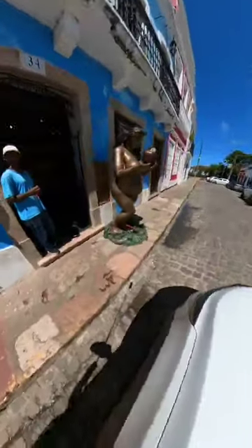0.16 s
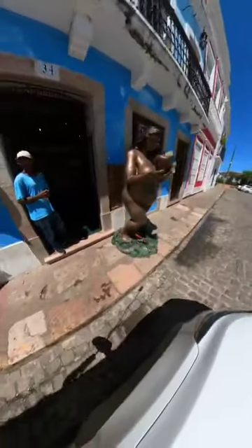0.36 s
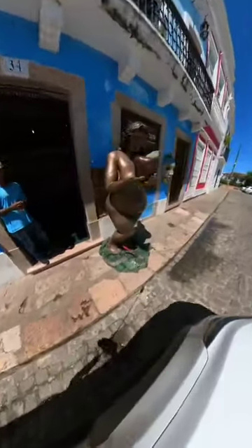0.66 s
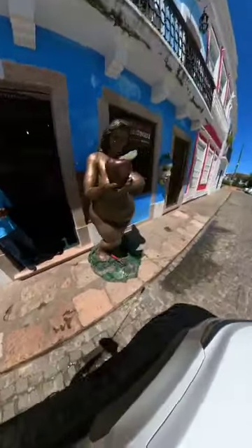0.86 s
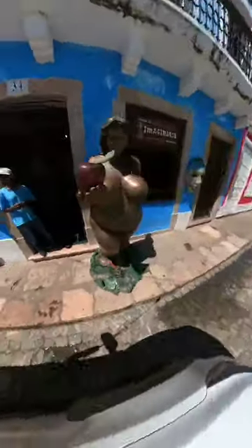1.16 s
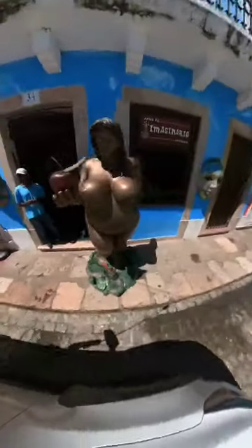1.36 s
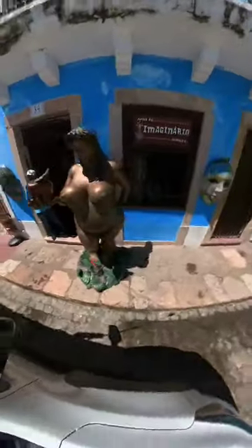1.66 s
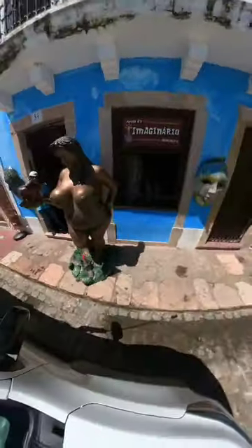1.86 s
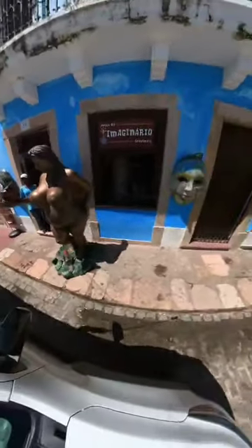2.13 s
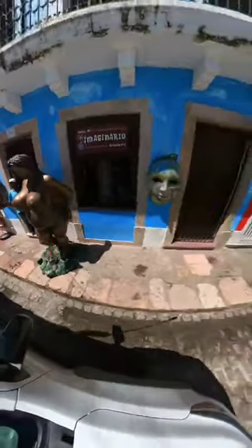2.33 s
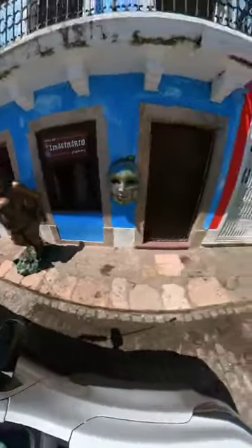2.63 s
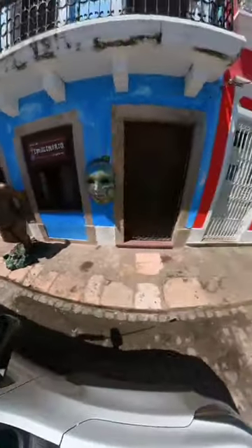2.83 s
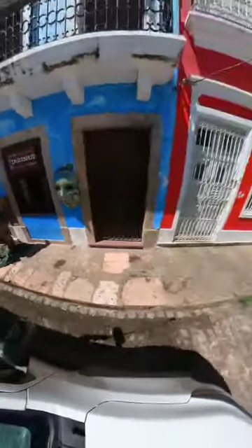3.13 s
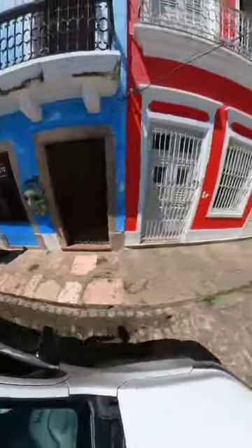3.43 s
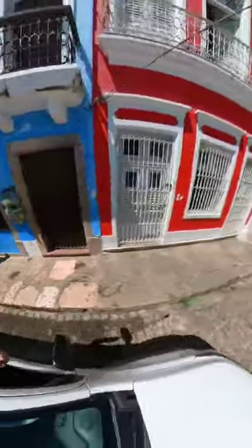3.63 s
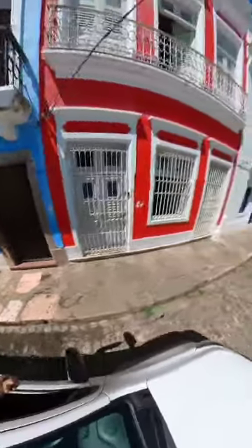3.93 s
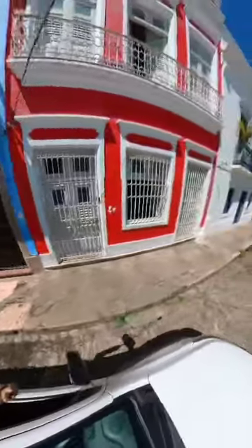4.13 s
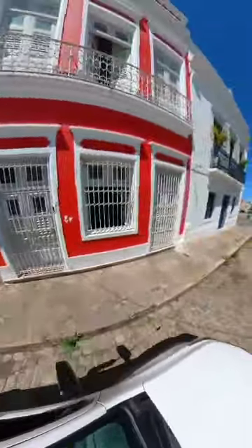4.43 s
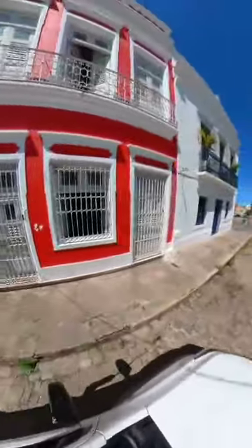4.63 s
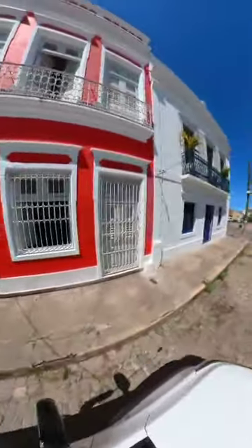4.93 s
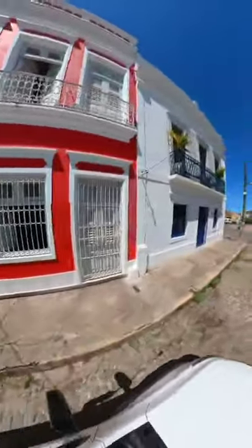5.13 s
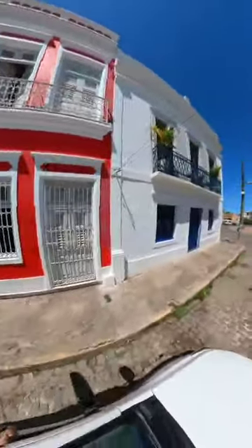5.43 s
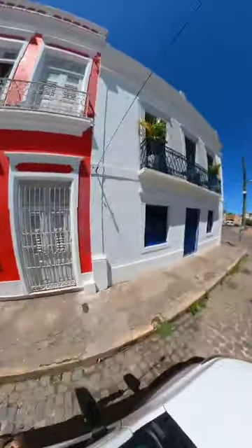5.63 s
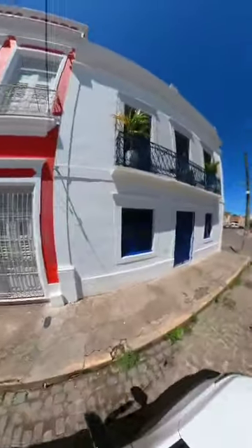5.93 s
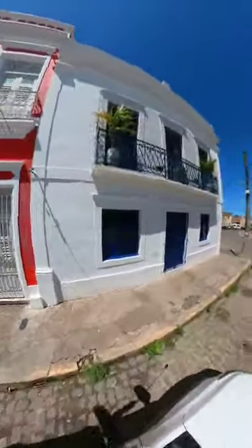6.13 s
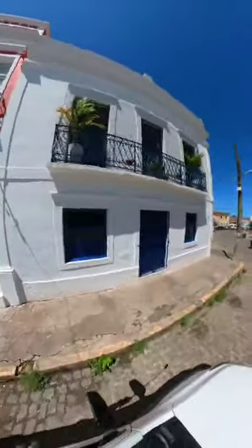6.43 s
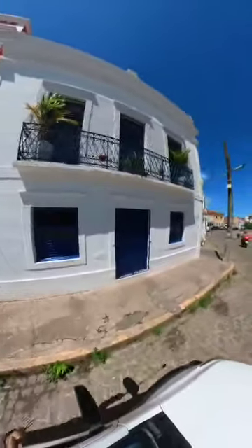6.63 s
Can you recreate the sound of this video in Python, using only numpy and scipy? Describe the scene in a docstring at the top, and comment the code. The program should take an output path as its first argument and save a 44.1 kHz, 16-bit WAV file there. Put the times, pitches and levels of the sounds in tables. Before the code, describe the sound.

Continuous low, bumpy tyre noise from a car on cobbles, held close to an exposed microphone, with slight reflections from nearby house fronts. The engine hums unsteadily underneath, rising a little midway. Small grit ticks stay faint. Muffled wind builds gradually, and deep falling-pitch thuds crowd together around five seconds, then thin out before the end.

```python
"""Cobbled street along house fronts: a small car rolls past them, microphone held outside the car.
Tyres: stone impacts trigger noise bursts that drum, roar, patter, hiss and crunch grit; the body booms in two modes.
Engine: wavering hum and drone tones climb as the car picks up a little speed.
Wind: growing muffled rumble, throbs and hard falling-pitch thumps; road noise dips in strong gusts."""
import sys
import numpy as np
from scipy import signal
from scipy.fft import rfft, irfft, next_fast_len
from scipy.io import wavfile
from scipy.ndimage import uniform_filter1d, minimum_filter1d, map_coordinates

SR = 44100
rng = np.random.default_rng(int(sys.argv[2]) if len(sys.argv) > 2 else 0)


def persist_wave(psi):
    """Save psi, clipped to +-1, as 16-bit WAV."""
    counts = np.round(np.clip(psi, -1, 1) * 32767).astype(np.int16)
    wavfile.write(sys.argv[1], SR, np.atleast_2d(counts).T)


N = 298998  # samples

# Tyre effort, groove ring and grit: t/s, rolling level/dB, groove ring level/dB, grit level/dB
ROAD = [(0, -2, -53, -70), (.75, -2.5, -51.5, -67), (1.28, 0, -48, -63.5), (1.35, -0.3, -50.5, -61),
        (2.2, 0.5, -46.5, -61), (2.5, 2.5, -46.5, -61), (2.6, 2.5, -45, -61), (3.0, 2.5, -45, -62),
        (3.45, 1, -48, -60), (4.0, 1.66, -46, -58), (4.9, 1, -48.5, -61), (5.5, -1.1, -51.5, -64.5),
        (6.05, 1.9, -65, -63.5), (6.78, -3.5, -55, -66.5)]
# Tyre spectra: f/Hz, relative density/(dB per Hz)
DRUM_SPECTRUM = [(40, -23), (90, -4), (140, -1.5), (200, -6), (300, -11.5), (450, -15.5), (800, -21.5),
                 (2000, -80), (5000, -110)]
ROAR_SPECTRUM = [(150, -26), (330, -4), (470, 0.5), (620, -1.5), (760, -6), (1000, -8), (1200, -18),
                 (1600, -21.5), (3000, -63), (8000, -100)]
PATTER_SPECTRUM = [(600, -29.5), (1100, 2.5), (1400, 0.5), (1600, -2.5), (1880, -1.5), (2300, -10),
                   (2750, -13.5), (3200, -19.5), (3550, -18.5), (4100, -31.5), (4700, -39.5), (6000, -37.5),
                   (9000, -92)]
# Air ringing in the tread grooves: f/Hz, relative density/(dB per Hz)
GROOVE_SPECTRUM = [(600, -36.5), (850, -5), (980, 0), (1130, -5), (1300, -11), (1800, -36.5), (5000, -92)]
# Tyre hiss near 3 kHz: f/Hz, relative density/(dB per Hz)
HISS_SPECTRUM = [(1900, -34), (2500, 0), (2900, -1.5), (3500, -13), (4300, -23.5), (6000, -49.5)]
# Hiss level before dips: t/s, level/dB
HISS_LEVEL = [(0, -72), (2.5, -69.5), (4.8, -65.5), (5.6, -62), (6.78, -63)]
# Singing tread blocks: multiple of drone f, level re groove ring/dB
WHINES = [(1.5, -3.5), (2.3, -2.5), (3.2, -4.5), (4.25, -3.5), (5.4, -12)]
# Car body modes, response squared in use: f/Hz, width before squaring/Hz, relative level/dB
BODY_MODES = [(108.3, 11, -5), (156.1, 16, -1)]
# Grit fizz and cracks: f/Hz, relative density/(dB per Hz)
GRIT_SPECTRUM = [(3000, -45), (4700, -24), (5300, -18), (6000, -6.5), (6600, 0.5), (7400, 1), (8000, -1.5),
                 (8500, -10.5), (9000, -22), (9500, -37.5), (9800, -62), (10500, -79.5)]
# Grit cracking under the tread: t/s, nominal peak level/dB
CRACKS = [(1.312, -49.5), (1.333, -44), (1.509, -43), (1.557, -42), (1.7386, -45.5), (1.803, -50),
          (1.985, -41.5), (2.62, -49.5), (3.098, -45.5), (3.194, -45.5), (3.358, -51), (3.8157, -52),
          (3.924, -38), (3.943, -49.5), (4.106, -46.5), (4.152, -46), (4.2046, -44), (4.782, -44.5),
          (6.058, -49)]
# Drivetrain drone: t/s, f/Hz
DRONE = [(0, 214), (2, 219.8), (2.65, 244.9), (3.05, 252.9), (3.55, 248.7), (4.3, 252.6), (4.9, 260.7),
         (5.5, 259.9), (6.78, 256.5)]
# Engine hum: t/s, f/Hz, level/dB
HUM = [(0, 101, -41.5), (.6, 102, -34.5), (.8, 103, -39), (1.2, 107, -34), (1.5, 108.5, -32.5),
       (2.2, 108, -33), (2.55, 109, -36), (2.8, 110, -26.5), (3.15, 116, -43.5), (4, 125.6, -35),
       (5.5, 130, -37), (6.2, 131, -30.5), (6.78, 131, -34)]
# Strong gusts: t/s, length including attack/s, depth of road noise dip/dB
GUSTS = [(4.628, 0.032, 3), (5.045, 0.073, 7.5), (5.164, 0.09, 4.5), (5.293, 0.081, 6), (5.432, 0.094, 5),
         (5.557, .03, 1), (5.675, 0.081, 3), (5.778, 0.051, 3.5), (5.892, .035, 4), (6.1, 0.028, 1),
         (6.19, 0.027, 2.5), (6.554, 0.12, 3)]
# Deep wind rumble: f/Hz, relative density/(dB per Hz)
BUFFET_SPECTRUM = [(10, -22.5), (22, -10.5), (35, 5), (65, 3), (100, -0.5), (160, -17.5), (300, -32.5),
                   (800, -52), (2000, -100)]
# Small eddies: f/Hz, relative density/(dB per Hz)
TUMBLE_SPECTRUM = [(70, -24.5), (140, -0.5), (200, -8), (330, -13.5), (600, -28.5), (1500, -68.5)]
# Small eddies: t/s, level/dB
TUMBLE_LEVEL = [(0, -43), (2, -49), (2.6, -34.5), (4, -36.5), (5.5, -35), (6.1, -36), (6.78, -39)]
# Airstream throbs: t/s, length/s, f/Hz, level/dB
THROBS = [(2.477, 0.034, 113, -14), (3.661, 0.66, 32.85, -32), (4.396, 0.26, 36.5, -31),
          (5.41, 0.13, 165, -26), (5.685, .03, 120, -19), (6.477, 0.21, 66.1, -24.5)]
# Wind thumps: t/s, relative peak level/dB, starting f/Hz, decay length/s, front steepness (0-2)
THUMPS = [(.845, -18, 75, .025, .3), (1.021, -17.5, 160, .028, 1), (2.404, -22, 240, .014, .8),
          (2.466, -15.5, 75, .022, .5), (2.489, -13.5, 135, .024, 1), (2.951, -21, 260, .016, 1),
          (3.692, -17, 180, .028, .8), (3.755, -17.5, 170, .024, .5), (3.911, -16, 80, .02, .3),
          (4.027, -20.5, 300, .014, .5), (4.275, -14.5, 160, .018, 1.1), (4.63, -10.5, 165, .03, 1.2),
          (4.883, -20, 220, .02, .8), (4.921, -17.5, 200, .02, .6), (4.963, -16.5, 170, .02, .5),
          (5.056, -16, 400, .009, 1), (5.069, -11, 100, .022, .6), (5.074, -15, 380, .007, .8),
          (5.221, -13.5, 140, .016, .8), (5.272, -22, 260, .012, .8), (5.319, -13, 90, .015, .3),
          (5.437, -14.5, 190, .016, 1.1), (5.465, -15, 175, .02, .5), (5.504, -17, 130, .02, .5),
          (5.693, -10.5, 155, .024, .4), (5.744, -16, 70, .022, .3), (5.749, -16, 390, .009, 1),
          (6.53, -17.5, 240, .014, 1)]

# Laws: (level/dB, dB gained per dB of rolling level)
DRUM_LAW, ROAR_LAW, PATTER_LAW = (-32.5, 0.59), (-39.5, 0.51), (-48, 1.3)
DRONE_LAW = (-43.3, 0.2)
DRUM_DB_PER_OCTAVE, CRUISE_HZ = -1, 244  # drumming against drone f
GROOVE_TRIM_DB = -0.5
WHINE_WIDTH_HZ, WHINE_FADE_DB = 23, 3.5  # width per unit of drone multiple; fade per unit of wobble
GUST_ATTACK_S, GUST_RELEASE_S = .025, .07
# dB per dB of dip: rumble gained; drum, roar and grit lost
GUST_LIFT, GUST_DRUM_DIP, GUST_ROAR_DIP, GUST_GRIT_DIP = 0.12, 0.52, 0.91, 0.94
WIND_START_DB, WIND_RISE_DB_PER_S = -33, 1.52
SMACK_DB, SMACK_T60_S = -15, .04  # at steepness 1, before the thump envelope
BASS_LIMIT, TOP_HZ = 0.3, 9600


def amp(db):
    """Decibels to gain."""
    return 10 ** (np.asarray(db) / 20)


def unit(x):
    """Scale to rms 1."""
    return x / np.sqrt(np.mean(x ** 2) + 1e-20)


def curves(rows):
    """Per-sample interpolation of each column after the time."""
    t_s, *columns = np.transpose(rows)
    return [np.interp(np.arange(N) / SR, t_s, column) for column in columns]


def wobble(rate_hz):
    """Smooth random curve, rate_hz knots per second."""
    knots = rng.standard_normal(int(N * rate_hz / SR) + 4)
    return map_coordinates(knots, [np.arange(N) * rate_hz / SR])


def filtered(x, response):
    """Apply a response of frequency by zero-padded FFT."""
    size = next_fast_len(N + SR // 2)
    return irfft(rfft(x, size) * response(np.fft.rfftfreq(size, 1 / SR)), size)[:N]


def coloured(x, spectrum):
    """Shape x by spectrum points on a log frequency axis, at rms 1."""
    f_hz, db = np.transpose(spectrum)
    return unit(filtered(x, lambda hz: amp(np.interp(np.log(hz + 1), np.log(f_hz), db))))


def add(track, t_s, sound):
    """Mix a short sound into track at t_s."""
    start = max(round(t_s * SR), 0)
    part = track[start:start + len(sound)]
    part += sound[:len(part)]


def blows(rate_hz, scatter, size_db):
    """Impulses near rate_hz, random in time (scatter in mean periods) and size."""
    draw = rng.standard_normal((int(rate_hz * N / SR) + 1, 2))
    periods = np.arange(len(draw)) + scatter * draw[:, 0]
    at = (periods * SR / rate_hz).astype(int) % N
    return np.bincount(at, amp(size_db * draw[:, 1]), N)


def bursts(hits, t60_s, steady):
    """Noise whose power is a steady share plus a decaying puff per hit."""
    t = np.arange(SR // 4) / SR
    decay = amp(-60 * t / t60_s) ** 2
    power = np.abs(signal.fftconvolve(hits ** 2, decay)[:N])
    share = np.clip(steady, 0, 1)
    return rng.standard_normal(N) * np.sqrt(share + (1 - share) * power / power.mean())


def tone(hz, db, waver, flutter_db):
    """Unsteady sine with a weak octave."""
    phase = 2 * np.pi * np.cumsum(hz * (1 + waver * wobble(18))) / SR
    wave = unit(np.sin(phase) + amp(-20.5) * np.sin(2 * phase))
    return amp(db + flutter_db * wobble(14)) * wave


def tyres(stones):
    """Each stone thuds in the carcass and works the tread; the sum dips in gusts."""
    dip_db = gusts()
    thuds = 0.2 * unit(stones) + bursts(stones, t60_s=0.12, steady=0.72)
    drum = coloured(thuds, DRUM_SPECTRUM)
    roar = coloured(street(bursts(stones, t60_s=0.06, steady=0.88), echo_db=-13), ROAR_SPECTRUM)
    drum_gain = amp(drumming() - GUST_DRUM_DIP * dip_db)
    roar_gain = amp(rolling(ROAR_LAW) - GUST_ROAR_DIP * dip_db)
    return drum_gain * drum + roar_gain * roar + amp(-dip_db) * (tread(stones) + hiss(stones))


def tread(stones):
    """Stones slap the tread and squeeze air from its grooves, which ring near 1 kHz."""
    _, groove_db, _ = curves(ROAD)
    slaps = street(bursts(stones, t60_s=0.06, steady=0.85), echo_db=-17.5)
    puffs = street(bursts(stones, t60_s=0.047, steady=0.73), echo_db=-8.5)
    patter = amp(rolling(PATTER_LAW)) * coloured(slaps, PATTER_SPECTRUM)
    ring = amp(groove_db + GROOVE_TRIM_DB) * coloured(puffs, GROOVE_SPECTRUM)
    return patter + ring + amp(groove_db) * whine()


def hiss(stones):
    """Tyre hiss near 3 kHz: steady noise with a puff per stone."""
    hiss_db, = curves(HISS_LEVEL)
    return amp(hiss_db) * coloured(bursts(stones, t60_s=0.05, steady=0.75), HISS_SPECTRUM)


def whine():
    """Tread blocks sing in narrow bands tied to drone f; each wanders and fades on its own."""
    drone_hz, = curves(DRONE)
    out = np.zeros(N)
    for multiple, db in WHINES:
        hz = multiple * drone_hz * (1 + .04 * wobble(6))
        phase = 2 * np.pi * np.cumsum(hz) / SR
        width_hz = multiple * WHINE_WIDTH_HZ
        band = wobble(width_hz) * np.cos(phase) + wobble(width_hz) * np.sin(phase)
        out += amp(db) * unit(band * amp(WHINE_FADE_DB * wobble(7)))
    return out


def rolling(law):
    """Level/dB following the rolling level."""
    level_db, growth = law
    return level_db + growth * curves(ROAD)[0]


def drumming():
    """Jolt level/dB: rises with rolling level, falls slightly as drone f rises."""
    octaves = np.log2(curves(DRONE)[0] / CRUISE_HZ)
    return rolling(DRUM_LAW) + DRUM_DB_PER_OCTAVE * octaves


def street(x, echo_db, count=5):
    """Kerb and house fronts return echoes whose paths drift as the car moves."""
    n = np.arange(N)
    out = x.copy()
    for delay_s in np.geomspace(.007, .034, count):
        lag_s = delay_s * (1 + 0.0594 * wobble(1.3))
        out += amp(echo_db) * map_coordinates(x, [n - lag_s * SR], order=1, mode="reflect")
    return unit(out)


def body(stones):
    """Stone jolts excite the low body resonances."""
    def modes(f):
        total = 0
        for hz, width_hz, db in BODY_MODES:
            damping = 1j * f * width_hz
            total = total + amp(db) * (damping / (hz ** 2 - f * f + damping)) ** 2
        return total
    return amp(drumming() - 10.5) * unit(filtered(stones, modes))


def grit(stones):
    """Sand fizzes steadily and crunches per stone; larger grains crack."""
    grit_db = curves(ROAD)[2] - GUST_GRIT_DIP * gusts()
    sand = rng.standard_normal(N)
    grains = unit(blows(300, scatter=2, size_db=3))
    crunch = bursts(np.sqrt(stones), t60_s=.05, steady=0) + .6 * grains
    # more grit, larger crunch share of the power
    share = np.clip(.52 * amp(grit_db + 59), 0, .52)
    fizz = coloured(np.sqrt(1 - share) * sand + np.sqrt(share) * unit(crunch), GRIT_SPECTRUM)
    flutter_db = .8 * wobble(45) + .6 * wobble(12)
    return amp(grit_db + flutter_db) * fizz + grain_cracks()


def grain_cracks():
    """Larger grains crack as short decaying noise."""
    cracks = np.zeros(N)
    t = np.arange(SR // 20) / SR
    decay = amp(-60 * t / .025)
    for t_s, db in CRACKS:
        # 7 dB of room for noise peaks above rms
        add(cracks, t_s, amp(db - 7) * decay * rng.standard_normal(len(t)))
    return np.std(cracks) * coloured(cracks, GRIT_SPECTRUM)


def engine():
    """Low engine hum; drivetrain drone about an octave up, louder with tyre effort."""
    hum_hz, hum_db = curves(HUM)
    drone_hz, = curves(DRONE)
    hum = tone(hum_hz, hum_db, waver=.009, flutter_db=1.3)
    drone = tone(drone_hz, rolling(DRONE_LAW), waver=.007, flutter_db=1.8)
    return hum + drone


def wind():
    """Eddies rumble and thump on the microphone; the rumble gives way under each thump."""
    thumps, swept = np.zeros(N), np.zeros(N)
    t = np.arange(SR // 5) / SR
    background = rumble() + small_eddies() + throbs()
    for t_s, db, hz, length_s, steep in THUMPS:
        push = (1 - np.exp(-t / .001)) * np.exp(-(t / length_s) ** 2)
        wave = thump_wave(t, hz, length_s, steep)
        add(thumps, t_s, amp(db + 1.5) * push * wave)
        add(swept, t_s, push)
    pressure = thumps + background * (1 - np.tanh(swept))
    # wind is heard as muffled low rumble and thumps
    return filtered(pressure, lambda hz: 1 / (1 + (hz / 900) ** 4))


def thump_wave(t, hz, length_s, steep):
    """Passing eddy sinks in pitch; a steep front adds early overtones and a smack."""
    falling_hz = hz * (.25 + .75 * np.exp(-2 * t / length_s))
    phase = 2 * np.pi * np.cumsum(falling_hz) / SR
    wave = np.sin(phase + steep * np.exp(-t / length_s) * np.sin(phase))
    band = signal.butter(2, (220, 520), 'bandpass', fs=SR, output='sos')
    puff = unit(signal.sosfilt(band, rng.standard_normal(len(t))))
    return wave + steep * amp(SMACK_DB - 60 * t / SMACK_T60_S) * puff


def rumble():
    """Deep eddies, evened out by the airstream of the moving car, grow with time and gusts."""
    rise_db = WIND_RISE_DB_PER_S * np.arange(N) / SR
    eddies = coloured(rng.standard_normal(N), BUFFET_SPECTRUM)
    swell = np.sqrt(np.abs(uniform_filter1d(eddies ** 2, size=SR // 5)))
    return amp(WIND_START_DB + rise_db + GUST_LIFT * gusts()) * unit(eddies / swell)


def small_eddies():
    """Small eddies tumble past in loose clumps above the deep rumble."""
    clumps = amp(3 * wobble(28))
    tumble = coloured(rng.standard_normal(N), TUMBLE_SPECTRUM)
    return amp(curves(TUMBLE_LEVEL)[0]) * unit(clumps * tumble)


def throbs():
    """The airstream at times sheds eddies at an even beat."""
    out = np.zeros(N)
    for t_s, length_s, hz, db in THROBS:
        swell = signal.windows.tukey(int(length_s * SR), .5)
        beat = tone(hz, db, waver=.03, flutter_db=1.5)
        add(out, t_s, swell * beat[:len(swell)])
    return out


def gusts():
    """Road noise dip/dB: fast attack, hold, release per gust."""
    dip_db = np.zeros(N)
    for t_s, length_s, depth_db in GUSTS:
        hold_end_s = t_s + max(length_s, GUST_ATTACK_S)
        shape = [(t_s, 0), (t_s + GUST_ATTACK_S, depth_db),
                 (hold_end_s, depth_db), (hold_end_s + GUST_RELEASE_S, 0)]
        dip_db += curves(shape)[0]
    return dip_db


def scene():
    """Front and rear wheels meet the stone rows at their own uneven beat; sum all sources."""
    stones = blows(26, scatter=.2, size_db=2.0) + blows(26, scatter=.35, size_db=3.0)
    return (tyres(stones) + body(stones) + grit(stones) + engine() + wind())[None]


def record(dry):
    """Bass peaks drive a look-ahead gain reduction; edges fade; sharp cut at TOP_HZ."""
    bass = filtered(dry[0], lambda hz: 1 / (1 + (hz / 600) ** 4))
    needed = np.minimum(1, BASS_LIMIT / (np.abs(bass) + 1e-9))
    gain = uniform_filter1d(minimum_filter1d(needed, size=900), size=900)
    fade = signal.windows.tukey(N, .001)
    return filtered(dry[0] * gain * fade, lambda hz: hz < TOP_HZ)[None]


dry = scene()
out = record(dry)
persist_wave(out)
```